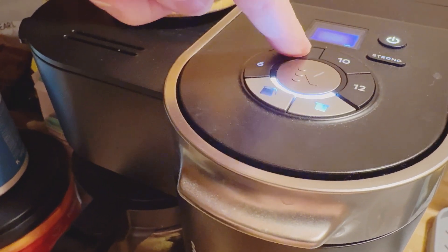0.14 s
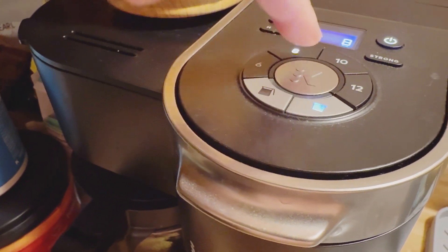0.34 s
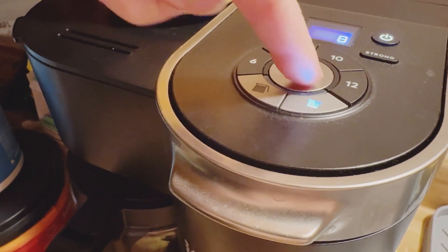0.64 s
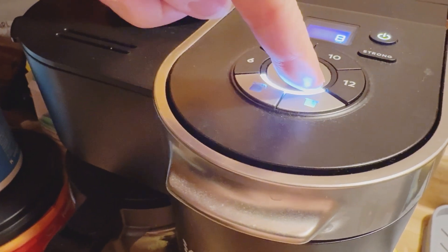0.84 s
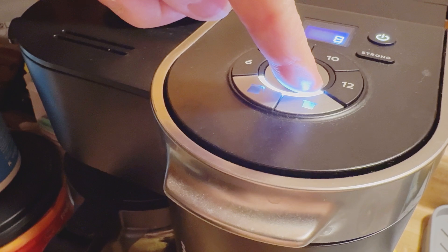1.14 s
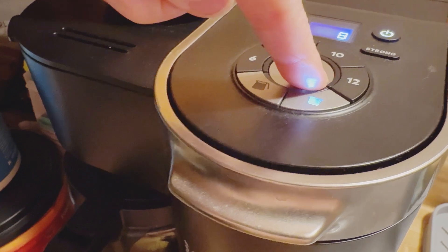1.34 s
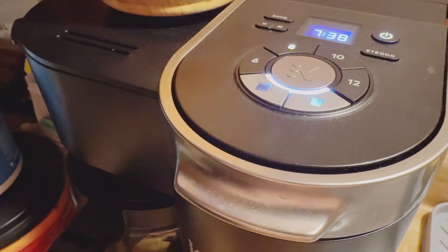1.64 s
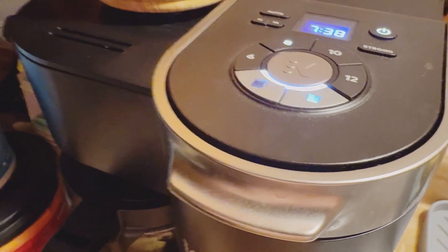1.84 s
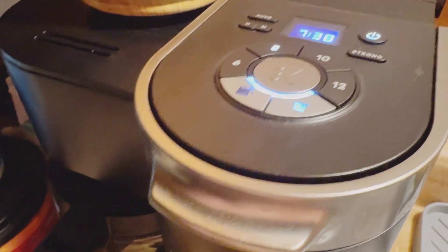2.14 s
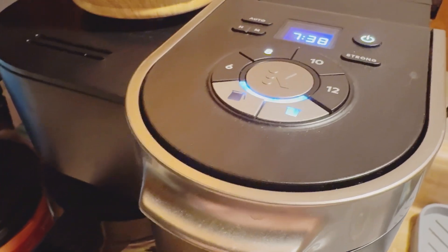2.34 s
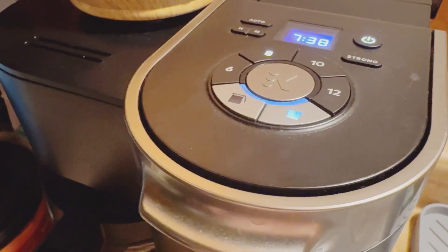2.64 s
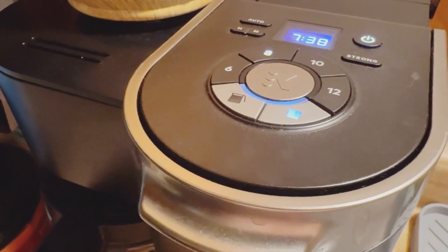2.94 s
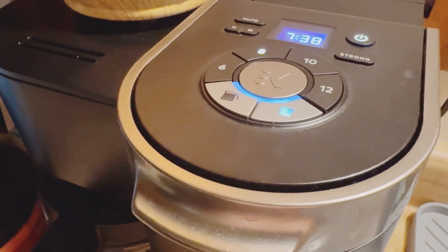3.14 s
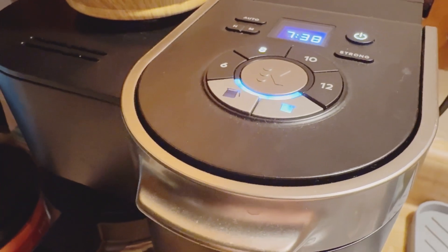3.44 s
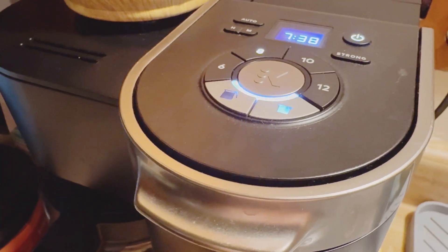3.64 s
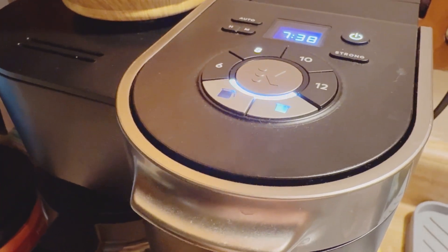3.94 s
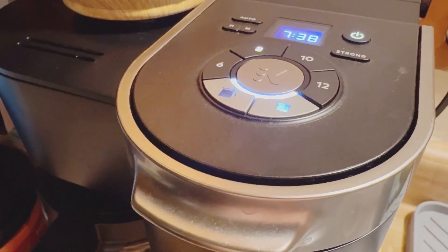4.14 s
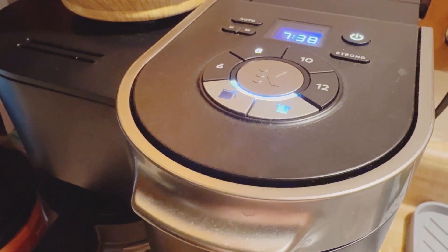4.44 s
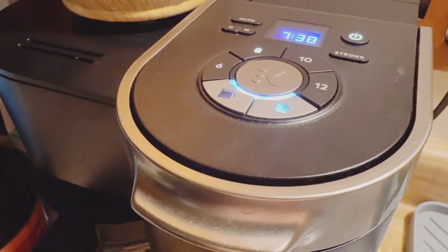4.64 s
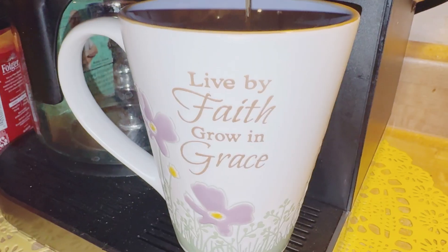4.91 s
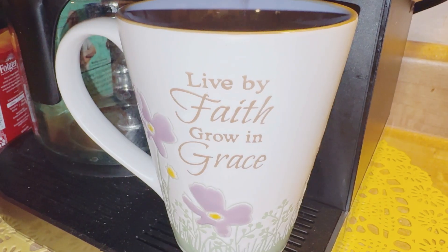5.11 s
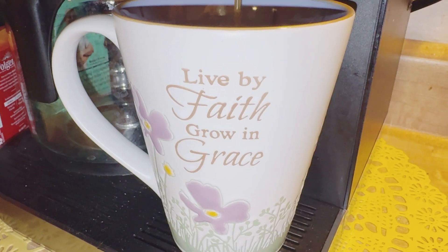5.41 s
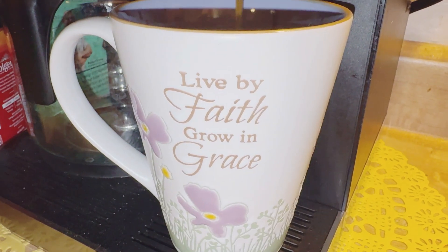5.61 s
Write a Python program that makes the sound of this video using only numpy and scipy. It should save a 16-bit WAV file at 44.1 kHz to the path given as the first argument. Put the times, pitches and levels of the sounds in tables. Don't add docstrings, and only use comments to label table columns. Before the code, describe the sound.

On a kitchen counter a coffee machine hums low, its pump throbbing under a thin water hiss. A finger knocks a plastic button almost at once, again harder after a second, then releases with a rattly clack. Only the machine continues, with one faint rub on the phone. An abrupt cut brings the microphone close to a mug: much louder pump buzz, spray, whistle, gurgling surges and sharp spatters.

```python
import sys
import numpy as np
from scipy import signal
from scipy.fft import rfft, irfft, next_fast_len
from scipy.io import wavfile
from scipy.ndimage import uniform_filter1d

SR = 44100
rng = np.random.default_rng(int(sys.argv[2]) if len(sys.argv) > 2 else 0)


def how_loud(loudness_db):
    steps = np.asarray(loudness_db, float) / 20
    return 10 ** steps


def transcribe(u):
    v = np.clip(np.atleast_2d(u).T, -1, 1)
    q = np.round(v * 32767).astype(np.int16)
    wavfile.write(sys.argv[1], SR, q)


N = 254456
CUT_S = 4.766

# (time [s], stroke rate [Hz], level [dB])
FILL_PUMP = [(0, 30.83, -60), (.6, 30.9, -55.5), (1.2, 31.12, -59), (2, 30.95, -56), (3, 30.93, -55.5),
             (4, 30.72, -57), (4.76, 31.03, -55)]
BREW_PUMP = [(4.78, 36.49, -41.5), (5.05, 36.51, -44.5), (5.4, 36.17, -43), (5.77, 35.81, -43)]
# (multiple of the stroke rate [1], level [dB])
FILL_ORDERS = [(2, -22), (3, -14), (4, 0), (5, -22), (5.67, -13), (6, -10), (7, -22), (8, -17), (9, -25),
               (10, -26), (11.6, -28)]
BREW_ORDERS = [(3, 0), (4, -24), (5, -8), (6, -2), (8, -20), (10, -15), (12, -17), (13, -21), (14, -17),
               (16, -22), (18, -20), (19, -22), (20, -21), (21, -16), (23, -22), (24, -14), (27, -16),
               (30, -16), (33, -21), (36, -18), (39, -21), (43, -17), (49, -20), (52, -22)]
# (frequency [Hz], density [dB per Hz])
RUMBLE = [(12, -67), (20, -30), (70, -8), (97, -13.5), (124, -6), (141, -6.5), (245, -13), (458, -28.5),
          (600, -32), (780, -80), (1320, -120)]
HISS = [(300, -40), (500, -7.5), (1000, -5.5), (2000, -2.5), (3300, -6), (3700, -11), (5000, -15),
        (6500, -24.5), (7300, -21.5), (8600, -15.5), (10000, -18.5), (13500, -25), (15500, -25.5)]
SPRAY = [(18, -55), (35, -22), (70, 3.5), (250, -5), (600, -3), (1600, 3.5), (2200, -3), (4000, -9.5),
         (7000, -12.5), (9000, -9.5), (11000, -13), (14000, -13.5), (15600, -10.5)]
RUB = [(150, -23), (310, 11.5), (470, -19), (700, -23), (5000, -48), (9000, -35), (15000, -43)]
RUMBLE_DB, HISS_DB = -62, -67
# (frequency [Hz], width [Hz], level over the hiss [dB])
CASING = [(664, 48, 11), (939, 75, 10), (1018, 53, 7), (1190, 51, 2.5), (1303, 42, 11), (2584, 60, 11),
          (2870, 50, 8), (3120, 39, 12), (3248, 39.5, 15.5), (3680, 64, 6), (4230, 39, 11),
          (4800, 26, 12.5), (5070, 37, 10.5)]
# (frequency [Hz], width [Hz], level over the spray [dB])
SPOUT = [(3310, 360, 4.5), (4680, 120, 2), (6280, 150, 8), (7240, 160, 9), (8700, 270, 4.5),
         (13400, 300, 8.5)]

# (frequency [Hz], width [Hz], level [dB])
MUG_WALL = [(890, 38, -8), (1360, 36, -3.5), (1531, 54, -1.5), (1786, 6.8, -11), (1930, 10, -26)]
# (time [s], frequency [Hz], level [dB])
MUG_AIR = [(4.77, 446, 4.5), (5.33, 456, -3.5), (5.35, 345, -3), (5.57, 392, 8), (5.77, 382.7, 10)]
# (start [s], length [s], push [dB], gurgle level [dB], gurgle start [Hz])
SURGES = [(4.815, 0.044, -3.5, -42.5, 1141), (4.962, .143, 1.5, -42.5, 1170), (5.128, 0.111, 1, -46, 1162),
          (5.258, 0.058, -4, -68, 1070), (5.335, 0.093, -12, -51, 1069), (5.445, 0.098, -18, -46.5, 1085),
          (5.55, 0.034, -15, -63, 1010), (5.6, 0.036, -12, -52, 1110), (5.68, .06, -24, -67, 1070),
          (5.745, .05, -22, -47, 1043)]
SURGE_EDGE_S, REST_DB, GURGLE_REST_DB, SAG_HZ, SAG_S = 0.01813, -12, -62.5, 90.1, .05
WALL_DB, AIR_DB, SPRAY_DB, WHISTLE_DB = -43, -47, -44, -43
WALL_SHARE, AIR_SHARE, SPRAY_SHARE, WHISTLE_SHARE = 0.77, 1.42, 0.19, 0.67
WHISTLE_HZ, WHISTLE_WIDTH = 5607, 110
SHIFT_S, DRY_SPOUT_DB = 5.322, -5.5
# (time [s], burst level [dB], ring
# frequency [Hz], ring level [dB])
SPATTERS = [(4.7775, -38, 3200, -50), (4.805, -30, 4800, -45), (4.9014, -49, 3100, -51),
            (4.9357, -46, 4600, -41), (4.964, -30.5, 4560, -30), (5.0532, -25.5, 5240, -48),
            (5.0928, -28.5, 3240, -48), (5.124, -30, 3600, -43), (5.1607, -30, 3430, -36),
            (5.2375, -33, 4530, -39), (5.263, -39, 4800, -50), (5.3043, -24, 5300, -44),
            (5.3433, -27, 3364, -45), (5.4064, -36, 3380, -39), (5.45, -45, 3420, -33),
            (5.5145, -29, 3900, -57), (5.5723, -26, 2860, -59), (5.6327, -28, 3200, -37),
            (5.653, -27, 4270, -29), (5.671, -24.5, 4530, -36),
            (4.8289, -21, 1090, -28.5),
    (4.8315, -23.5, 3150, -33.5),
]
DROPLET_LOW_HZ, DROPLET_HIGH_HZ, DROPLET_DB = 6830, 9200, -12
DROPS_PER_S, DROP_S, DROP_SIZE = 70, 0.0017, 0.85

# (time [s], lid [dB], key [dB], switch tick [dB], key stiffness [factor on its modes])
PRESSES = [(.093, -57, -57, -71, 0.84), (0.1356, -31.5, -30.5, -38.5, 1.015), (.145, -60, -45, -55, 0.75),
           (.487, -78, -54, -62, 1.07), (1.1576, -25.5, -35.5, -42.5, 0.93), (1.188, -68, -64, -54, 1.6),
           (1.232, -61, -56, -51, 0.9), (1.366, -60, -52, -70, 1.04), (1.4224, -30.5, -56, -63, 1),
           (1.437, -46, -41, -46, 1.78), (1.446, -66, -48, -58, 0.88), (1.459, -59, -46.5, -57, 1.25),
           (1.472, -50, -48, -54, 1.3), (1.475, -53, -47, -65, 0.85), (1.483, -52, -54, -67, 0.93)]
# (frequency [Hz], level [dB], t60 [s])
LID = [(600, -10, .05), (770, 0, .09), (985, -4, .07), (1405, -8, .05), (1700, -9, .05)]
KEY = [(1773, 7, 0.023), (1970, -12, 0.039), (2460, -5, 0.07), (2790, -9.5, 0.039), (3105, -6.5, 0.032),
       (3800, -2.5, 0.0098)]
SWITCH = [(8580, 0, 0.0075), (10800, -10, 0.0049), (12040, -5, 0.0075), (14400, -2, 0.0062),
          (14200, -13, 0.0065)]
BODY = [(175.4, -7, 0.15), (277.5, -2.5, 0.043), (455, -2.5, 0.024)]
# (level [dB], frequency [Hz], t60 [s])
DOME = (-37, 14200, 0.034)
DOME_S = 1.158
# (time [s], level [dB])
ROCKS = [
    (.144, -34.5),
    (1.174, -41),
    (1.188, -43),
    (1.205, -45),
    (1.238, -45.5),
    (1.441, -36.5),
]
THUMP_DB = -11
THUD_DB, THUD_LOW_HZ, THUD_HIGH_HZ, THUD_T60, SHIVER_DB, SHIVER_T60 = -5.5, 550, 1770, 0.033, -20, 0.28

# (rise [s], hold [s], release [s])
GRIP = (.03, .11, .05)
BRUSH = (.025, .03, .05)
GRIP_S, BRUSH_S, GRIP_DB, BRUSH_DB = 2.745, 2.795, -58.5, -70

# (frequency [Hz], correlation [0 to 1])
SAME = [(30, 1), (200, 0.92), (400, 0.77), (800, 0.48), (2000, 0.29), (3000, 0.4), (7000, 0.98)]
SAME_NEAR = [(30, 0.34), (250, 0.33), (800, 0.44), (2000, 0.16), (3200, 0.17), (7000, 0.37)]
# (frequency [Hz], difference [dB])
LEAN = [(100, -1.5), (300, 1.5), (1000, 4.5), (2000, -3), (4500, 6), (7000, 5)]
LEAN_NEAR = [(100, 10), (300, 12.5), (1000, 7.5), (2000, -2), (7000, 0.5)]
# (frequency [Hz], lag [rad])
LEAD = [(300, 0.5), (1500, -0.5), (2500, 5), (3300, 1.55), (4500, 1), (7000, 1)]
TREBLE_HZ, IN_STEP_HZ, COMB_HZ, EDGE_HZ = 7400, 8020, 3070, 15950


def pump(rows, orders, waver_db, slip):
    hz, level_db = columns(rows)
    strokes = np.cumsum(hz) / SR
    hum = 0
    for k, db in orders:
        level = how_loud(db + waver_db * wander(15))
        phase = 2 * np.pi * (k * strokes + rng.random()) + slip * wander(9)
        hum = hum + level * np.cos(phase)
    return np.sqrt(2) * how_loud(level_db) * hum, strokes


def filling():
    hum, strokes = pump(FILL_PUMP, FILL_ORDERS, 1.5, 0.31)
    throb_db = 3.78 * np.cos(2 * np.pi * (strokes - .3)) + 1.5 * wander(12)
    hiss = how_loud(HISS_DB) * noise(HISS, SAME, LEAN, CASING, .9, size=2048)
    steady = signal.filtfilt(*signal.butter(2, 1700, fs=SR), hiss)
    throbbing = steady * how_loud(0.049 * throb_db) + (hiss - steady) * how_loud(throb_db - 0.5)
    rumble = how_loud(RUMBLE_DB + 1.95 * wander(2.6)) * noise(RUMBLE, SAME, LEAN, (), 0.79, size=2048)
    return hum * how_loud([[.1], [-.1]]) + throbbing + rumble


def brewing():
    hum, strokes = pump(BREW_PUMP, BREW_ORDERS, 1.66, 0.13)
    push_db, gurgle, gurgle_hz = surges()
    flicker_db = 0.98 * wander(60) + 0.31 * np.cos(2 * np.pi * 2 * strokes)
    spray_level = how_loud(SPRAY_DB + SPRAY_SHARE * push_db + 4.5 + flicker_db) * crackle()
    spray = spray_level * noise(SPRAY, SAME_NEAR, LEAN_NEAR, SPOUT, 1.96, size=512)
    slosh = rng.standard_normal((2, N)) + 1.14 * rng.standard_normal(N)
    whistle = resonate(resonate(slosh, WHISTLE_HZ, WHISTLE_WIDTH), WHISTLE_HZ, 930)
    whistle_db = WHISTLE_DB + WHISTLE_SHARE * push_db + DRY_SPOUT_DB * swell(SHIFT_S, .01, 1, .01)
    whistle = how_loud(whistle_db - 5.0 + 3.4 * wander(70)) * whistle
    return hum * how_loud([[-.3], [.3]]) + spray + whistle + mug(slosh, push_db, gurgle, gurgle_hz) + spatter()


def surges():
    t, hz = np.arange(N) / SR, np.full(N, SURGES[0][-1] * 1.0)
    push, gurgle = how_loud(REST_DB), how_loud(GURGLE_REST_DB)
    for s, length, push_db, gurgle_db, start_hz in SURGES:
        shape = swell(s - SURGE_EDGE_S / 2, SURGE_EDGE_S, length - SURGE_EDGE_S, SURGE_EDGE_S)
        push = push + how_loud(push_db) * shape
        gurgle = gurgle + how_loud(gurgle_db) * shape
        sagging = start_hz - SAG_HZ * (1 - np.exp(-np.maximum(t - s, 0) / SAG_S))
        hz = np.where(t > s - SURGE_EDGE_S, sagging, hz)
    return 20 * np.log10(push), gurgle, uniform_filter1d(hz, size=400)


def mug(slosh, push_db, gurgle, gurgle_hz):
    wall = 0
    for f, width, db in MUG_WALL:
        level = how_loud(db + 1.3 * wander(30))
        wall = wall + level * bubble(slosh, f * (1 + 0.0044 * wander(8)), width, 0.88)
    wall = how_loud(WALL_DB + WALL_SHARE * push_db) * evened(wall)
    air_hz, air_db = columns(MUG_AIR)
    air = how_loud(AIR_DB + air_db + AIR_SHARE * push_db) * bubble(slosh, air_hz, 28, 1.0)
    return (wall + air + gurgle * bubble(slosh, gurgle_hz, 51, 1.16)) * how_loud([[1.6], [-1.6]])


def bubble(slosh, hz, width, clear):
    tone = np.sqrt(2) * np.cos(2 * np.pi * np.cumsum(hz * (1 + 0.0059 * wander(40))) / SR)
    shaken = clear * tone * how_loud(2 * wander(35))
    return evened(shaken + resonate(resonate(slosh, hz, width), hz, 3 * width))


def crackle():
    drops = (rng.random(N) < DROPS_PER_S / SR) * rng.exponential(DROP_SIZE, N)
    return evened(1 + signal.lfilter([1], [1, -np.exp(-1 / (DROP_S * SR))], drops))


def spatter():
    dry, t = np.zeros(N), np.arange(700) / SR
    for s, db, low_hz, low_db in SPATTERS:
        puff = rng.standard_normal(len(t)) * how_loud(-60 * t / 0.014)
        surface = [(low_hz, 0, .012), (1.15 * low_hz, -2, .01), (1.3 * low_hz, -3, .01)]
        droplet = [(rng.uniform(DROPLET_LOW_HZ, DROPLET_HIGH_HZ), 0, .016)]
        add(dry, s, how_loud(low_db - 0.5) * ring(surface, rough=0.86, size=20))
        add(dry, s, how_loud(db + DROPLET_DB) * ring(droplet, rough=0.39))
        add(dry, s, how_loud(db - 6.5) * (puff[1:] - 0.58 * puff[:-1]))
    return dry * how_loud([[.8], [-.8]]) + how_loud(-5.5) * kitchen(dry, .11, 9000)


def buttons():
    dry = np.zeros(N)
    for s, lid_db, key_db, tick_db, stiffness in PRESSES:
        add(dry, s, how_loud(tick_db) * ring(SWITCH, rough=0.52))
        add(dry, s, how_loud(key_db) * ring(KEY, stiffness, rough=0.62, held=0.0068, size=40))
        add(dry, s - .0004, how_loud(lid_db) * ring(LID, rough=0.28, rise=0.0008, held=0.0065, size=60))
        add(dry, s, how_loud(lid_db + THUD_DB) * thud())
        add(dry, s + 0.00386, how_loud(lid_db + THUMP_DB) * ring(BODY, rise=0.0033))
    for s, db in ROCKS:
        add(dry, s, how_loud(db) * ring(BODY, rise=0.0017))
    dome_db, dome_hz, dome_t60 = DOME
    add(dry, DOME_S, how_loud(dome_db) * ring([(dome_hz, 0, dome_t60)], rough=.5))
    return dry * how_loud([[1.5], [-1.5]]) + how_loud(-13.5) * kitchen(dry)


def thud():
    t = np.arange(SR // 5) / SR
    band = signal.butter(3, [THUD_LOW_HZ, THUD_HIGH_HZ], "band", fs=SR)
    shaken = signal.lfilter(*band, rng.standard_normal(len(t)))
    decay = how_loud(-60 * t / THUD_T60) + how_loud(SHIVER_DB - 60 * t / SHIVER_T60)
    return evened(shaken) / 2 * decay * np.minimum(t / 0.00091, 1)


def ring(modes, stiffness=1, rough=0, rise=0.00043, held=1, size=12):
    t = np.arange(SR // 5) / SR
    shake = 1 + rough * evened(uniform_filter1d(rng.standard_normal((len(modes), len(t))), size=size))
    tone = 0
    for k, (f, db, t60) in enumerate(modes):
        decay = how_loud(db - 60 * t * stiffness ** 1.4 / t60)
        sense = (-1) ** k
        tone = tone + sense * decay * np.cos(2 * np.pi * f * stiffness * t) * shake[k]
    tone = tone * (1 - np.exp(-t / rise)) * how_loud(-17 * np.clip((t - held) / 0.0016, 0, 1))
    return tone / abs(tone).max()


def grip():
    rub = swell(GRIP_S, *GRIP) * how_loud(GRIP_DB + 0.99 * wander(32)) * noise(RUB, SAME, LEAN, size=512)
    bright = noise([(3000, -16), (8000, -3), (15000, -6)], SAME, LEAN, size=512)
    return rub + swell(BRUSH_S, *BRUSH) * how_loud(BRUSH_DB) * bright


def kitchen(x, t60=0.22, treble_hz=3000):
    t = np.arange(SR // 3) / SR
    tail = rng.standard_normal((2, len(t))) * how_loud(-60 * t / t60) * (t > .002)
    tail = signal.lfilter(*signal.butter(1, treble_hz, fs=SR), tail)
    return signal.fftconvolve(x[None], tail / np.linalg.norm(tail[0]), axes=1)[:, :N]


def noise(spectrum, same, lean, peaks=(), patchy_db=0.5, size=1024):
    hz = np.fft.rfftfreq(size, 1 / SR)
    a, b, c, d, patches = rng.standard_normal((4 * N // size + 5, len(hz), 5)).T
    patches = evened(uniform_filter1d(uniform_filter1d(patches, size=10, axis=0), size=10, axis=1))
    shape_db = read(spectrum, hz) + sum(db / (1 + (2 * (hz - f) / w) ** 2) for f, w, db in peaks)
    like = np.clip(read(same, hz), 0, 1)[:, None]
    left, other = a + 1j * b, c + 1j * d
    lag = np.exp(-1j * read(LEAD, hz))[:, None]
    right = like * left * lag + np.sqrt(1 - like ** 2) * other
    tilt = how_loud(read(lean, hz) / 2)[:, None]
    z = np.array([left * tilt, right / tilt]) * how_loud(shape_db[:, None] + patchy_db * patches)
    return evened(signal.istft(z, nperseg=size, noverlap=3 * size // 4)[1][:, :N])


def resonate(x, hz, width):
    turn = np.exp(2j * np.pi * np.cumsum(hz * np.ones(N)) / SR)
    r = np.exp(-np.pi * width / SR)
    return evened((turn * signal.lfilter([1 - r], [1, -r], x / turn)).real)


def swell(start, rise, hold, release):
    t = np.arange(N) / SR - start
    return np.clip(np.minimum(t / rise, (rise + hold + release - t) / release), 0, 1) ** 2


def wander(hz):
    steps = rng.standard_normal(int(N / SR * hz * 2) + 2)
    return evened(signal.resample(steps, N))


def evened(x):
    return x / np.sqrt(np.mean(x ** 2) + 1e-20)


def read(points, hz):
    f, value = np.transpose(points)
    return np.interp(np.log(hz + 1), np.log(f + 1), value)


def columns(rows):
    s, *rest = np.transpose(rows)
    return [np.interp(np.arange(N) / SR, s, c) for c in rest]


def add(mix, s, sound):
    part = mix[round(s * SR):][:len(sound)]
    part += sound[:len(part)]


def scene():
    t = np.arange(N) / SR
    out = np.clip((CUT_S - t) / 0.003, 0, 1)
    into = np.clip((t - CUT_S) / 0.027, 0, 1)
    return out * (filling() + buttons() + grip()) + into * brewing()


def roll_off(x):
    return signal.sosfilt(signal.butter(12, 16440, fs=SR, output="sos"), x)


def record(dry):
    size = next_fast_len(N)
    hz = np.fft.rfftfreq(size, 1 / SR)
    left, right = rfft(dry, size)
    shared = np.clip((hz - TREBLE_HZ) / 600 + .5, 0, 1)
    early = left * np.exp(2j * np.pi * (hz - IN_STEP_HZ) / COMB_HZ)
    right = shared * early + np.sqrt(1 - shared ** 2) * right
    low_cut = 1 / np.sqrt(1 + (34 / (hz + 1)) ** 6)
    edge = how_loud(-np.clip(hz - EDGE_HZ + 250, 0, 1000) * .08) * low_cut
    mix = irfft(np.array([left, right]) * edge, size)[:, :N]
    return roll_off(mix)


dry = scene()
out = record(dry)
transcribe(out)
```